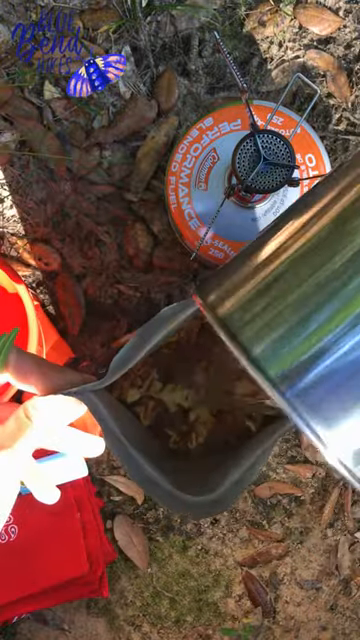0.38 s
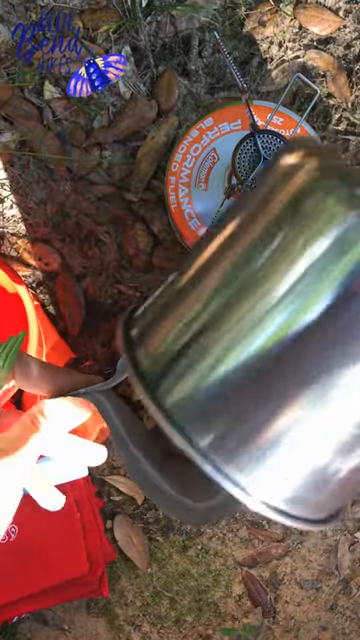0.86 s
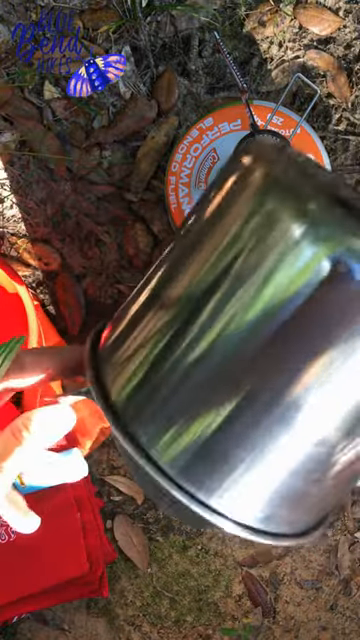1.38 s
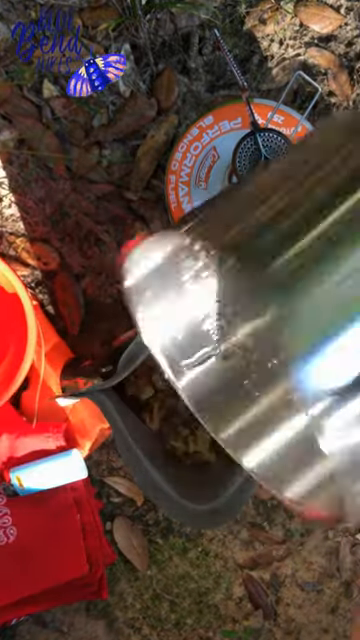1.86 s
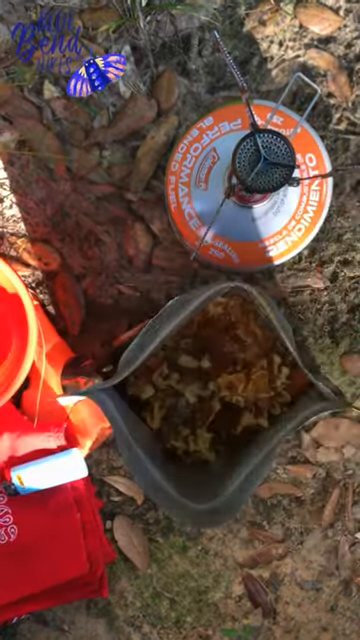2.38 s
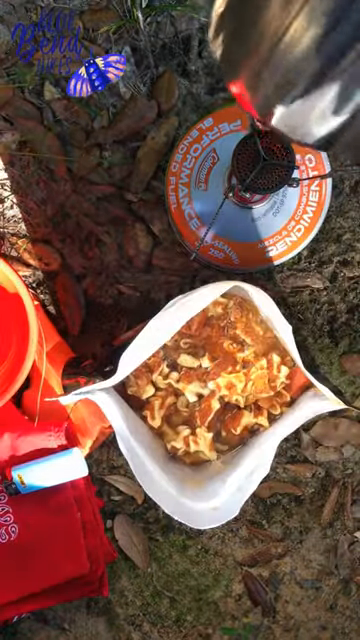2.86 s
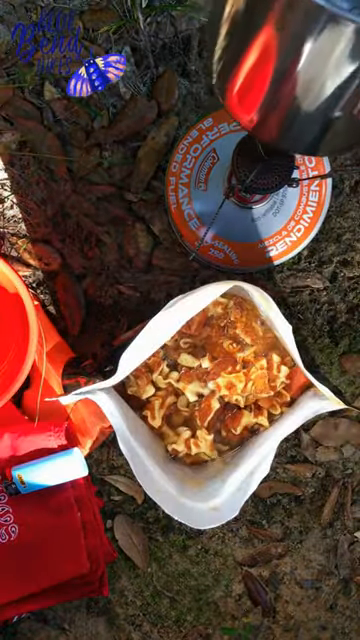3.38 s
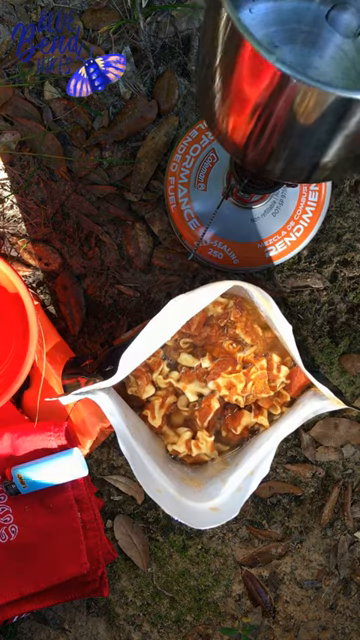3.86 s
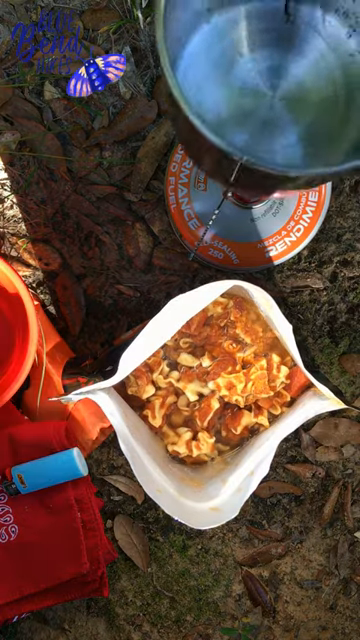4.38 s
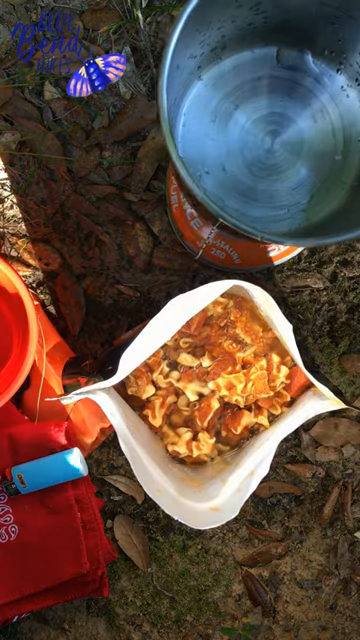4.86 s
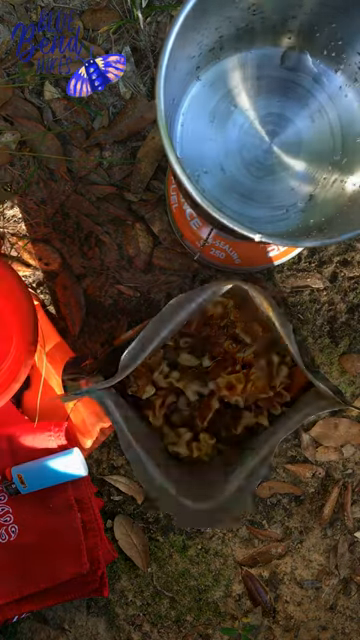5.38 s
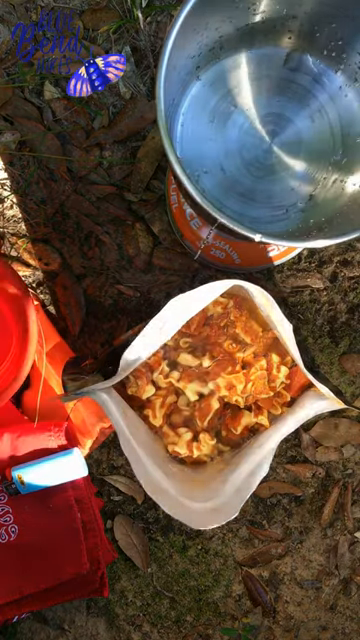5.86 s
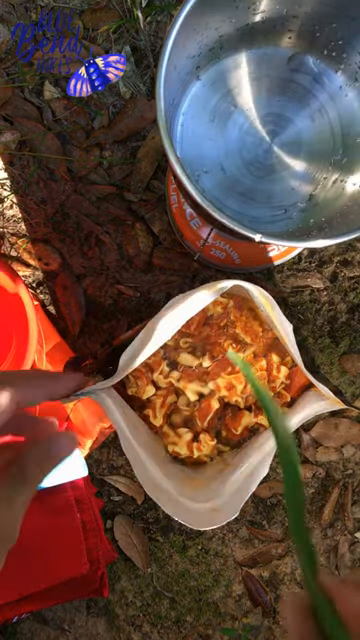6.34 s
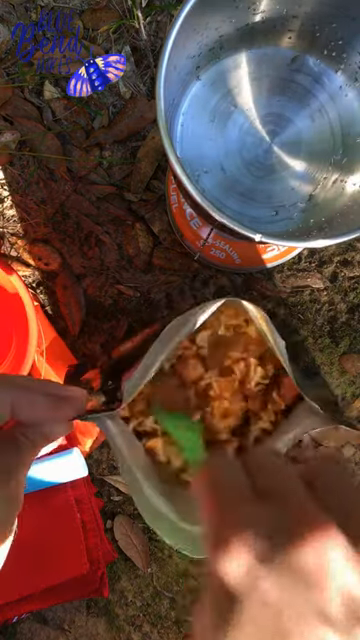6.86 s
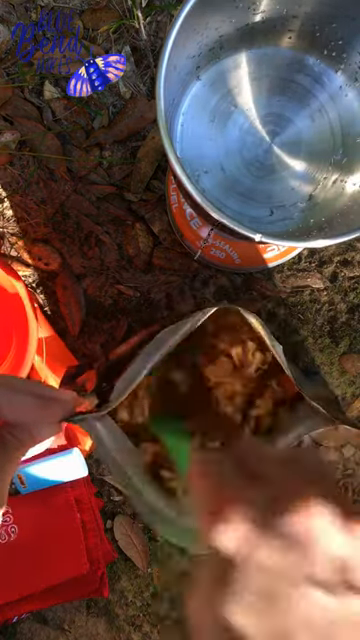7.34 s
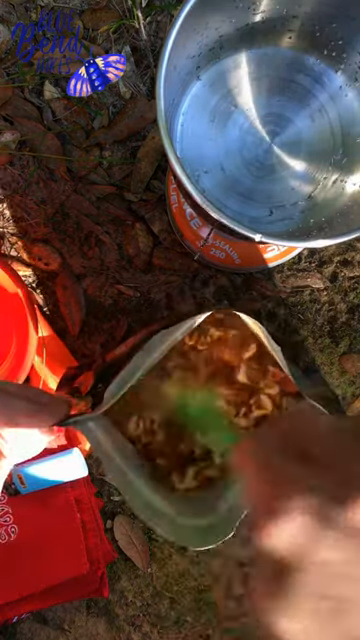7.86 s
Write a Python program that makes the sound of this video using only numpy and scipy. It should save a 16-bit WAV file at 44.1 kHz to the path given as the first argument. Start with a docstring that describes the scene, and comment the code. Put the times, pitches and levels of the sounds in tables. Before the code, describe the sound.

Outdoors over a low rumble and crickets, a steel pot knocks and scrapes onto a small stove; a foil pouch crackles before and after.

```python
"""An empty steel pot is set down on the wire arms of a camping stove: it knocks, slides, squeaks and rocks to rest.
Impacts and friction drive its damped modes; regular stick-slip makes the squeak, a harmonic stack.
A foil food pouch crackles and drips as it is filled and later stirred: random noise bursts and rising, damped tones.
Crickets trill in gliding notes over a band of hiss, above a low outdoor rumble of shaped noise."""
import sys
import numpy as np
from scipy import signal
from scipy.fft import rfft, irfft
from scipy.io import wavfile

SR = 44100
rng = np.random.default_rng(int(sys.argv[2]) if len(sys.argv) > 2 else 0)


def materialize(psi):
    """Save the field psi as 16-bit PCM at rate SR to the path in sys.argv[1].

    A 1-D psi becomes a single channel; in a 2-D psi each row is a channel.
    """
    bounded = np.clip(np.atleast_2d(psi).T, -1, 1)
    quanta = np.round(bounded * 32767).astype(np.int16)
    wavfile.write(sys.argv[1], SR, quanta)


def volts_from_db(level):
    """Convert decibel levels to linear amplitude ratios."""
    exponent = np.asarray(level, float) / 20
    return 10 ** exponent


N = 362937
CUSHIONED_UNTIL_S = 4.3   # until then the hand cushions the contacts of the pot


def rms_one(x):
    """Normalisation: scale to rms 1."""
    return x / np.sqrt(np.mean(x ** 2) + 1e-20)


def in_time(rows, outside=None):
    """Linear interpolation: the columns after the time become curves, one value a sample."""
    s, *columns = np.transpose(rows)
    return [np.interp(np.arange(N) / SR, s, c, outside, outside) for c in columns]


def drift(rate):
    """Low-pass filtered chance: a slow fluctuation of spread 1, with both poles at the rate in Hz."""
    r = np.exp(-80 * np.pi * rate / SR)   # drawn at every 40th sample
    white = rng.standard_normal(N // 40 + 2002)
    slow = signal.lfilter([1], [1, -2 * r, r * r], white)[2000:]
    return np.interp(np.arange(N) / 40, np.arange(len(slow)), rms_one(slow))


def ring(x, hz, t60):
    """Damped resonance: a unit click sets a sine of initial height 1 ringing, 60 dB down after t60."""
    r, w = volts_from_db(-60 / (t60 * SR)), 2 * np.pi * hz / SR
    return signal.lfilter([0, np.sin(w)], [1, -2 * r * np.cos(w), r * r], x + 1e-18)


def fading(x, seconds):
    """Exponential relaxation: each push dies away with this time constant."""
    return signal.lfilter([1], [1, -np.exp(-1 / (seconds * SR))], x + 1e-18)


def band(x, low_hz, high_hz):
    """Band limitation by a Butterworth band-pass of order 2."""
    edges = [low_hz, min(high_hz, .45 * SR)]
    return signal.sosfilt(signal.butter(2, edges, "band", fs=SR, output="sos"), x)


def near(x, hz):
    """Selective excitation: a contact drives each mode only near its own pitch."""
    reach = 1.23   # frequency ratio
    return band(x, hz / reach, hz * reach)


def coloured(spectrum):
    """Spectral shaping: noise of rms 1 whose density follows rows of (frequency [Hz], density [dB])."""
    hz, db = np.transpose(spectrum)
    grid = np.arange(1, N // 2 + 2) * SR / N
    gain = volts_from_db(np.interp(np.log(grid), np.log(hz), db))
    return rms_one(irfft(rfft(rng.standard_normal(N)) * gain, N))


def add(out, s, sound):
    """Superposition: lay a short sound in at time s."""
    i = round(s * SR)
    np.add.at(out, np.arange(i, min(i + len(sound), N)), sound[:N - i])


def clicks(events):
    """Impulsive excitation: single-sample pushes from rows (time [s], gain)."""
    out = np.zeros(N)
    for s, gain in events:
        out[round(s * SR)] = gain
    return out


def open_air():
    """Broadband ambient noise: a stationary random signal with most of its power at low frequencies."""
    # rumble and far traffic: (frequency [Hz], relative density [dB per Hz])
    air_spectrum = [(20, -33), (40, -17.5), (65, 2), (100, 1.5), (130, -9.5), (220, -17), (330, -30.5),
                    (1000, -59), (4900, -65), (7000, -36.5), (15500, -80.5), (16500, -50)]
    return volts_from_db(-39.5) * coloured(air_spectrum)


def far_crickets():
    """Superposition of many sources: far crickets blur into a band of hiss."""
    centre_hz, width_hz, level_db = 7840, 1580, -65.5
    edges = centre_hz + width_hz * np.linspace(-.5, .5, num=4)
    hiss = np.zeros(N)
    for low, high in zip(edges, edges[1:]):   # each part of the band swells on its own
        hiss += volts_from_db(2.5 * drift(1.5)) * band(rng.standard_normal(N), low, high)
    return volts_from_db(level_db) * rms_one(hiss)


def near_cricket():
    """Amplitude and frequency modulation: each wing stroke is a short note gliding down."""
    # trills, swelling and breaking off: (start [s], end [s], relative level at the end [dB])
    trills = [(0, 0.208, -53.5), (0.538, 0.843, -52.5), (1.307, 1.67, -52), (1.977, 2.258, -52.5),
              (2.493, 3.031, -57.5), (5.306, 5.84, -54), (6.194, 6.552, -53), (6.927, 7.185, -53),
              (7.55, 7.818, -52)]
    t = np.arange(N) / SR
    to_go, level = np.zeros(N), np.zeros(N)
    for start, end, db in trills:
        sounding = (t > start) * (t < end)
        to_go += (end - t) / (end - start) * sounding   # falls from 1 to 0 over the trill
        level += volts_from_db(db) * sounding
    swell = volts_from_db(-11 * to_go) * level
    stroke = (55.9 * t + rng.random()) % 1   # phase of the wing stroke, 55.9 a second
    # a trill climbs in pitch as it swells
    hz = 7550 - 350 * to_go - 1500 * stroke + 100 * drift(36.26)
    note = np.sin(2 * np.pi * np.cumsum(hz) / SR)
    uneven = volts_from_db(2.5 * drift(23))
    pulse = np.sin(np.pi * np.clip(stroke / 0.91, 0, 1)) ** 2
    return swell * uneven * pulse * note * 2


def rustle(crackle_db):
    """Friction noise: a soft shaped hiss that follows part of the swing in handling."""
    # spectrum of the foil: (frequency [Hz], relative density [dB per Hz])
    foil_spectrum = [(350, 0.5), (650, 5), (1100, 6), (1800, -5), (3500, -8.5), (7000, -43)]
    level_db, follows = -62, 0.42   # level at mean handling; share of its swing
    rustle_db = level_db + follows * (crackle_db - crackle_db.mean())
    strokes = volts_from_db(1.23 * drift(39.0))   # it comes in uneven rubs
    return volts_from_db(rustle_db) * strokes * coloured(foil_spectrum)


def crackles():
    """Poisson impulses: small crackles of random size scatter over the whole range."""
    rate = 160 * volts_from_db(5.0 * drift(10))   # chances a second
    born = (rng.random(N) < rate / SR) * volts_from_db(0.97 * np.minimum(rng.exponential(1, N), 4.0))
    width, grain = 1.22, rng.standard_normal(N)
    dealt = rng.integers(0, 8, N)
    out = np.zeros(N)
    for k, hz in enumerate(np.geomspace(2000, 14000, num=8)):
        burst = fading(born * (dealt == k), 0.00054) * grain
        out += band(burst, hz / width, hz * width) * (hz / 8000) ** 0.52
    # crackles too small to tell apart
    fizz = volts_from_db(-19.5 + 3.84 * drift(33)) * band(rng.standard_normal(N), 6000, 17000)
    return out + fizz


def wet_pops():
    """Impulse-excited resonators: pops in the wet food ring for a few cycles at random pitches."""
    per_s, level_db, cycles = 70, -10, 8.9   # rate, level under the crackle, t60 in cycles
    pops = (rng.random(N) < per_s / SR) * volts_from_db(1.88 * np.minimum(rng.exponential(1, N), 4.0))
    sizes = rng.integers(0, 10, N)
    wet = np.zeros(N)
    for k, hz in enumerate(np.geomspace(600, 4200, num=10)):
        wet += ring(pops * (sizes == k), hz, cycles / hz)
    return volts_from_db(level_db) * band(wet, 740, 6400)


def snaps():
    """Transient radiation: big snaps thump the foil at their own pitch, with a shorter treble tick."""
    # loudest snaps: (time [s], body peak [dB], nominal body frequency [Hz], treble peak [dB])
    snap_rows = [(0.146, -46, 2400, -23.5), (0.407, -37, 4140, -44), (0.959, -47, 594, -25),
                 (0.995, -43, 2400, -48), (1.007, -36.5, 810, -56), (1.048, -40, 1100, -52),
                 (1.081, -35, 1070, -52), (1.0913, -37, 3130, -46), (1.11, -32, 1860, -27.5),
                 (1.141, -45, 1110, -25), (1.179, -47, 2200, -37), (1.219, -41.5, 1100, -14),
                 (1.243, -37, 630, -33), (1.362, -35, 696, -50), (6.623, -34.5, 725, -72),
                 (6.73, -35, 690, -72), (6.95, -37, 1060, -49), (7.106, -24, 890, -21),
                 (7.125, -31.5, 840, -59), (7.347, -24, 636, -25), (7.357, -36.5, 1030, -23),
                 (7.435, -32.5, 1030, -45), (7.715, -31, 940, -36), (7.888, -23.5, 786, -95),
                 (7.984, -25, 1010, -29), (8.013, -16, 1020, -11.5), (8.096, -36.5, 1180, -47)]
    out, t = np.zeros(N), np.arange(1200) / SR
    for s, db, hz, treble_db in snap_rows:
        puff = rng.standard_normal(len(t)) * np.exp(-t / 0.0035)
        thump = band(band(puff, hz / 1.76, hz * 1.48), hz / 2, hz * 2)
        body = thump + volts_from_db(-12) * band(puff, 1410, 3960)
        tick = band(rng.standard_normal(len(t)) * np.exp(-t / .0012), 6000, 16500)
        add(out, s, volts_from_db(db) * body / np.abs(body).max() + volts_from_db(treble_db) * tick / np.abs(tick).max())
    return out


def drips():
    """Damped oscillation: each drop of poured water sounds a decaying tone of rising pitch."""
    # drops: (time [s], initial level [dB], start frequency [Hz])
    drops = [(0.148, -40.5, 2470), (0.339, -45.5, 2500)]
    rise_hz_per_s, dying_s = 17000, 0.0069
    out, t = np.zeros(N), np.arange(1200) / SR
    for s, db, hz in drops:
        cycles = (hz + rise_hz_per_s * t / 2) * t
        add(out, s, volts_from_db(db) * np.exp(-t / dying_s) * np.sin(2 * np.pi * cycles))
    return out


def swishes():
    """Friction noise in bands: hand, spoon and wet food slide softly along the foil."""
    # strokes: (start [s], length [s], rms level before the fade in and out [dB], nominal frequency [Hz])
    swish_rows = [(1.716, 0.28, -65, 3400), (6.103, 0.2, -62, 3300), (6.53, 0.098, -57, 1730),
                  (6.796, 0.11, -59, 2550), (7.144, 0.14, -60, 2480), (7.789, 0.099, -42, 845)]
    out = np.zeros(N)
    friction = rng.standard_normal(N) * volts_from_db(3.5 * drift(63))
    for s, length, db, hz in swish_rows:
        piece = friction[round(s * SR):round((s + length) * SR)]
        rub = band(band(piece, hz / 1.77, hz * 1.37), hz / 2, hz * 2)
        add(out, s, volts_from_db(db) * rms_one(rub) * np.sqrt(np.hanning(len(rub))))
    return out


def pouch():
    """Superposition of foil and food sounds; the force of handling sets crackle, pops and rustle."""
    # how hard the pouch is handled: (time [s], relative crackle level [dB])
    handling = [(0, -34.5), (.9, -42), (1.12, -36), (1.4, -45), (6.45, -45.5), (6.86, -36), (7.1, -43),
                (7.4, -31.5), (7.65, -41), (7.95, -40), (8.23, -30.5)]
    crackle_db, = in_time(handling)
    handled = volts_from_db(crackle_db) * (crackles() + wet_pops())
    return handled + rustle(crackle_db) + snaps() + drips() + swishes()


def contacts():
    """Contact mechanics: impact pulses, their chatter and sliding friction become forces on the pot.

    Each list returned runs over bright modes, base, upper wall, lower wall."""
    # pot set down on the arms, relative: (time [s], bright ring [dB], base ring [dB], wall ring [dB])
    knocks = [(3.3408, -7.5, -14.5, -25.5), (3.3643, -5.5, -25, -15.5), (3.386, -6.5, -45, -41),
              (3.464, -9, -38, -45), (3.497, -16, -39, -43), (3.559, -21, -55, -37),
              (3.6571, -10.5, -30.5, -32), (3.6824, -23, -35, -29), (3.697, -17, -45, -31),
              (4.3554, -19, -76, -65)]
    # pot rocking on its edge, relative: (time [s], upper wall ring [dB], lower wall ring [dB])
    rocks = [(4.5386, -20.5, -19.5), (4.5617, -20, -17), (4.593, -17, -12), (4.633, -15.5, -11),
             (4.6704, -15, -11.5), (4.711, -18.5, -26), (4.7365, -44, -12.5)]
    # pot dragged over the arms: (time [s], relative friction [dB], contact from 0 base to 1 wall)
    slide_rows = [(4.17, -42, 0.69), (4.235, -37.5, 0.32), (4.255, -35.5, 0.99), (4.42, -42.5, 0.79),
                  (4.53, -40, 0.68)]
    rock_bright_db, sharpens_db_per_s, rock_base_db = -5, 62, -22.5   # relative to the upper wall
    rows = [(*row, row[-1]) for row in knocks]
    for s, db, low_db in rocks:   # the bright share grows from rock to rock
        bright_db = db + rock_bright_db + sharpens_db_per_s * (s - rocks[0][0])
        rows.append((s, bright_db, db + rock_base_db, db, low_db))
    rows = np.array(rows)
    blows = [clicks(zip(rows[:, 0], volts_from_db(db))) for db in rows[:, 1:].T]
    slide_db, contact = in_time(slide_rows, outside=-200)[0], np.clip(in_time(slide_rows)[1], 0, 1)
    slide = volts_from_db(slide_db)
    slides = [slide]
    # base, upper wall, lower wall under the bright modes
    for db, share in zip((-4.5, -7.5, -6.5), (1 - contact, contact ** 2, contact)):
        slides.append(volts_from_db(db) * slide * share)
    held = np.arange(N) < CUSHIONED_UNTIL_S * SR
    press_s = (0.0025, 0.00039)   # time a contact takes to bite: cushioned, then free
    pressed = []
    for blow in blows:
        pressed.append(sum(fading(blow * when, s) / (s * SR) for when, s in zip((held, ~held), press_s)))
    push = [0, *(fading(blow, .00008) for blow in blows[1:])]   # the body also takes a soft push
    # after every contact the pot skids a little: level under the contact, dying time
    skid_db, skid_s = (-13.5, -6, -18, -18), 0.018
    drag = [f + volts_from_db(db) * fading(p, skid_s) for f, p, db in zip(slides, pressed, skid_db)]
    chatter = [volts_from_db(-32.5) * fading(p, 0.0021) for p in pressed]
    white = rng.standard_normal(N)
    forces = [volts_from_db(-33.5) * p + (c + volts_from_db(-33) * d) * white for p, c, d in zip(push, chatter, drag)]
    return forces, pressed, drag


def body_modes(forces):
    """Modal synthesis: base and wall ring as damped resonators, each driven by its own part's force."""
    # modes of the body: (frequency [Hz], relative level [dB], t60 [s])
    modes = [(489, -19.5, 0.32), (728, -3, 0.15), (960.7, 5, 0.11), (2455, -4, 0.3), (2525, -2, 0.07),
             (2720, -1, 0.04), (3305, -3, 0.12)]
    base_top_hz, low_wall_top_hz = 2000, 2600
    out = np.zeros(N)
    for hz, level_db, t60 in modes:
        part = 1 if hz < base_top_hz else 3 if hz < low_wall_top_hz else 2
        # the point of contact wanders and catches now one mode, now another
        wandering = forces[part] * volts_from_db(5.0 * drift(21))
        out += volts_from_db(level_db) * ring(near(wandering, hz), hz, t60)
    return out


def bright_modes(force):
    """Modal density: each bright mode rings with six weaker neighbours that die sooner."""
    # bright modes: (frequency [Hz], relative level [dB])
    modes = [(3740, -25), (5400, -21), (6190, -27), (7060, -23.5), (7644, -20.5), (8230, -20.5), (8450, -4),
             (9200, -12), (9860, -12.5), (11250, -18), (12500, -20), (13400, -13), (14400, -29),
             (15100, -13)]
    t60 = 0.12
    out = np.zeros(N)
    for hz, level_db in modes:
        drive = near(force * volts_from_db(level_db + 5 * drift(14)), hz)
        out += ring(drive, hz, t60)
        for near_hz in hz * (1 + 0.0448 * rng.uniform(-0.97, 1, size=6)):
            out += volts_from_db(-6.0) * ring(drive, near_hz, t60 / 2)
    return out


def free_rim():
    """Beating: close rim modes start in opposition, so the pair swells out of silence."""
    # modes of the free rim: (frequency [Hz], relative level [dB], t60 [s])
    modes = [(1429, -2, 1.15), (1454, 0, .85), (2466, -9, .6), (3216, -14, .9), (3297, -16, .8)]
    blow = clicks([(3.344, volts_from_db(-29))])   # only the first landing catches the rim free
    stopped_hz, stop_s, dying_s = 1454, 3.655, .02   # the second landing damps one mode of the pair
    stopped = np.exp(-np.maximum(np.arange(N) / SR - stop_s, 0) / dying_s)
    out = np.zeros(N)
    for k, (hz, db, t60) in enumerate(modes):
        tone = (-1) ** k * volts_from_db(db) * ring(blow, hz, t60)
        out += tone * (stopped if hz == stopped_hz else 1)
    return out


def settling_base():
    """Free decay of a single mode: the base hums softly as it settles."""
    s, db, hz, t60 = 3.715, -52, 570, .5
    return ring(clicks([(s, volts_from_db(db))]), hz, t60)


def wall_squeal():
    """Frictional self-excitation: the wall squeals, gliding down a little, as the slide catches."""
    s, db, hz, above_hz, dying_s = 4.245, -39, 3300, 50, .03   # above_hz: start above the final pitch
    since = np.maximum(np.arange(N) / SR - s, 0) / dying_s
    turn = 2 * np.pi * np.cumsum(hz + above_hz * np.exp(-2 * since)) / SR
    return volts_from_db(db) * 2 * np.sqrt(since) * np.exp(-since) * np.sin(turn)


def crack(pressed, drag):
    """Modal overlap: the dense modes that die at once merge into short high noise."""
    level = volts_from_db(-8) * fading(pressed, 0.003) + volts_from_db(-19 + 3 * drift(80)) * drag
    return level * band(rng.standard_normal(N), 9250, 15500)


def stove_clank(base_pressed):
    """Structure-borne impact: once the hand lets go, each rock jolts the stove with a dull clank."""
    freed = np.arange(N) >= CUSHIONED_UNTIL_S * SR
    level = volts_from_db(11) * fading(base_pressed * freed, 0.014)
    return level * band(rng.standard_normal(N), 240, 1700)


def pot():
    """Modal superposition: knocks and sliding friction feed the same modes, share by share."""
    forces, pressed, drag = contacts()
    out = body_modes(forces) + bright_modes(forces[0]) + free_rim() + settling_base() + wall_squeal()
    out += crack(pressed[0], drag[0])
    # little radiates below the lowest mode
    radiated = signal.sosfilt(signal.butter(8, 440, "high", fs=SR, output="sos"), out)
    return radiated + stove_clank(pressed[1])


def squeak():
    """Stick-slip: regular slips of an arm make a harmonic stack whose odd multiples throb."""
    # level of the multiples, relative: (time [s], even [dB], odd [dB])
    squeak_rows = [(4.345, -70, -60), (4.357, -21.5, -38), (4.377, -18.5, -33), (4.385, -25, -11.5),
                   (4.398, -25, -19.5), (4.415, -38, -34.5), (4.44, -55, -70)]
    # harmonics: (multiple of the fundamental, relative level [dB])
    orders = [(1, -14.5), (2, -11.5), (3, -2), (4, 2.5), (5, -13.5)]
    even_db, odd_db = in_time(squeak_rows, outside=-200)
    turn = 2 * np.pi * np.cumsum(2743 * (1 + 0.0062 * drift(160))) / SR   # fundamental near 2743 Hz
    throb = 1 + 0.45 * np.sin(2 * np.pi * 178 * np.arange(N) / SR)
    share = [volts_from_db(even_db), volts_from_db(odd_db) * throb]
    stack = np.zeros(N)
    for k, db in orders:
        k = round(k)
        stack += share[k % 2] * volts_from_db(db + drift(120)) * np.sin(k * turn)
    return stack


def whine():
    """Narrow-band modulation: a thin tone of unsteady pitch and level as the slide goes on."""
    # level of the whine before its flutter: (time [s], level [dB])
    whine_rows = [(4.395, -57), (4.41, -33), (4.5, -29.5), (4.54, -61)]
    whine_db, = in_time(whine_rows, outside=-200)
    hz = 11330 * (1 + 0.0057 * drift(154))
    return volts_from_db(whine_db + 3.6 * drift(170)) * np.sin(2 * np.pi * np.cumsum(hz) / SR)


def scene():
    """Linear superposition: pot, pouch and crickets over the open air, in one channel."""
    crickets = far_crickets() + near_cricket()
    return (open_air() + crickets + pouch() + pot() + squeak() + whine())[None]


def band_limit(x):
    """A steep low-pass at the top of the band."""
    return signal.sosfilt(signal.butter(12, 16990, fs=SR, output="sos"), x)


def record(dry):
    """Band limitation: one microphone with the top cut off, 40 dB down from 16300 Hz."""
    cut = signal.sosfilt(signal.cheby2(12, 40, 16300, fs=SR, output="sos"), dry)
    return band_limit(cut)


dry = scene()
out = record(dry)
materialize(out)
```